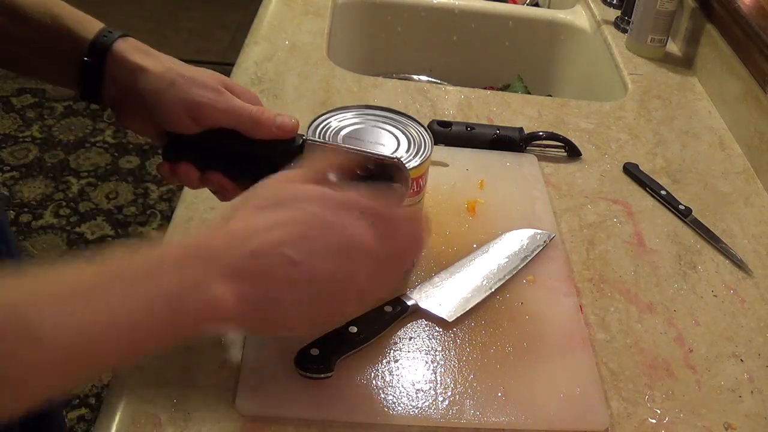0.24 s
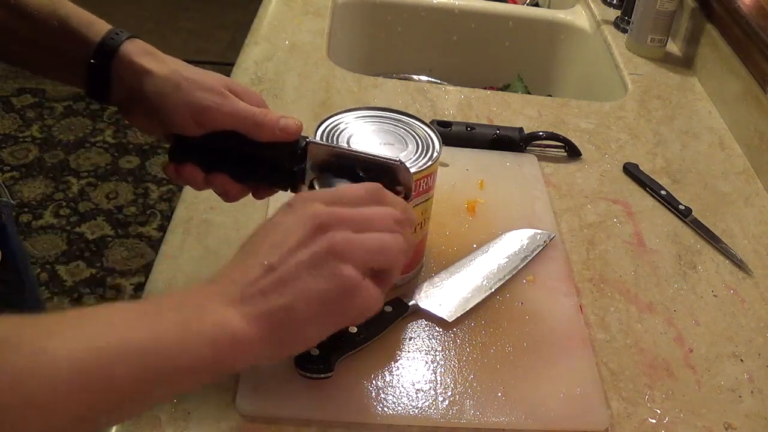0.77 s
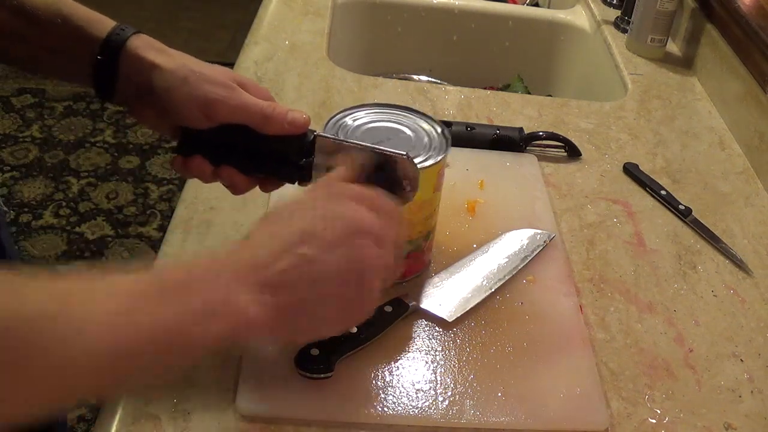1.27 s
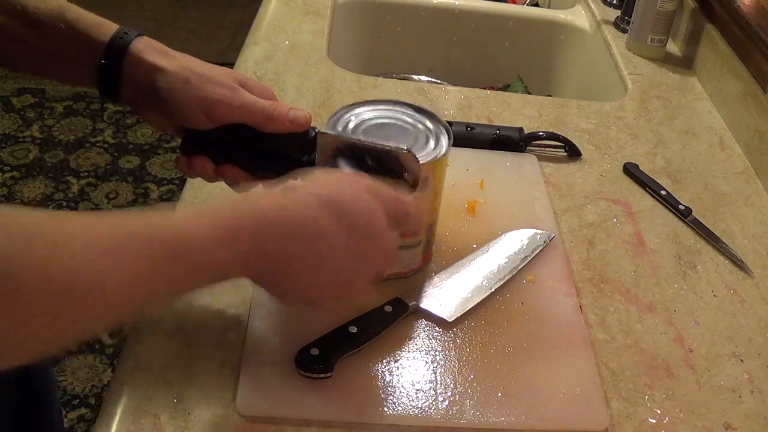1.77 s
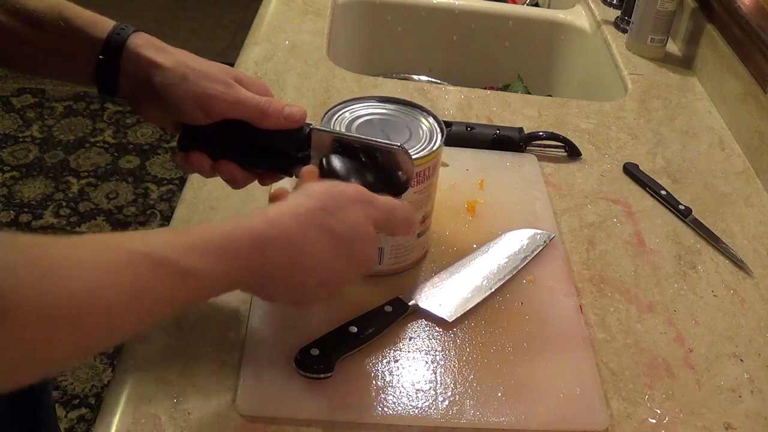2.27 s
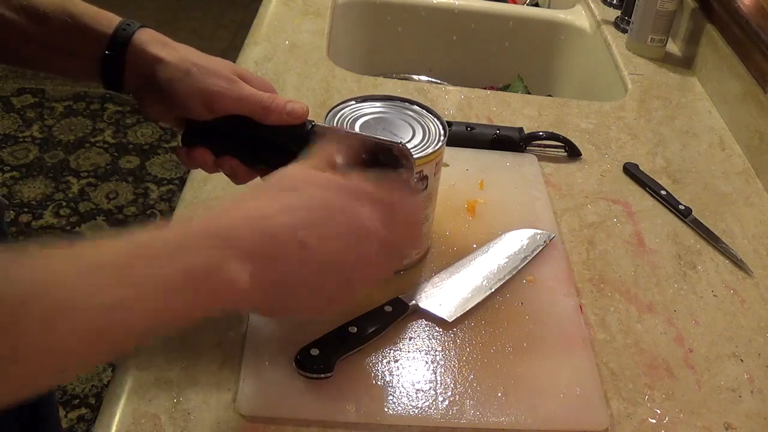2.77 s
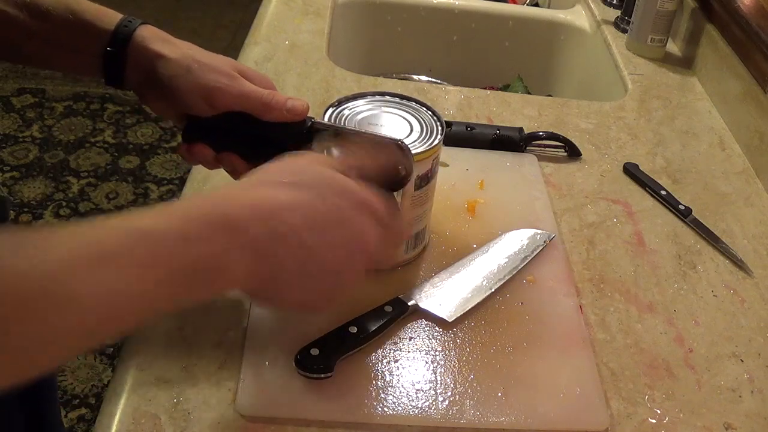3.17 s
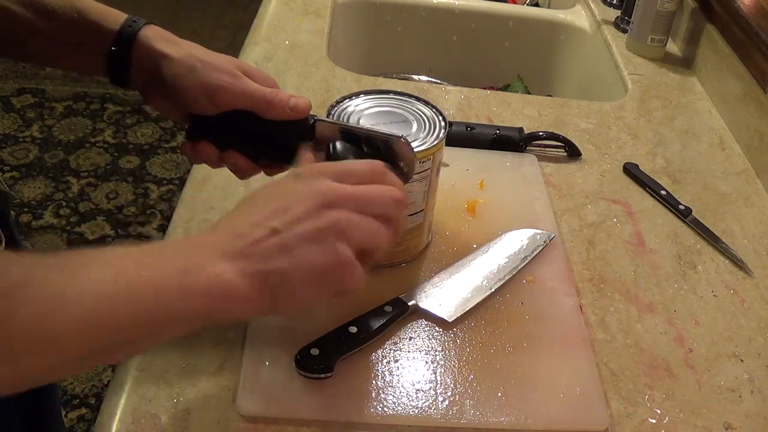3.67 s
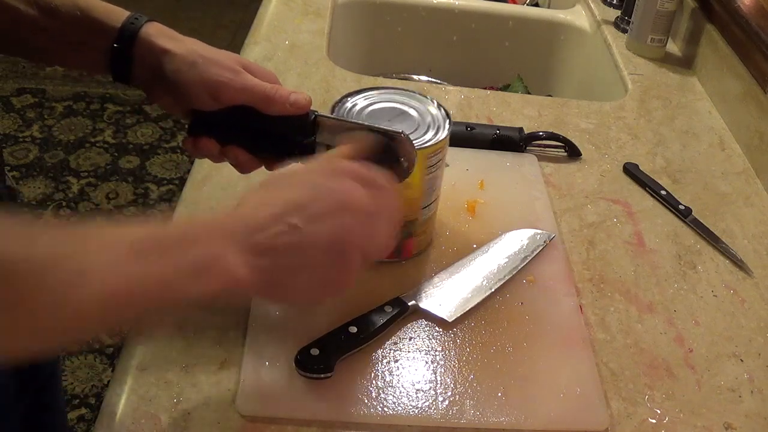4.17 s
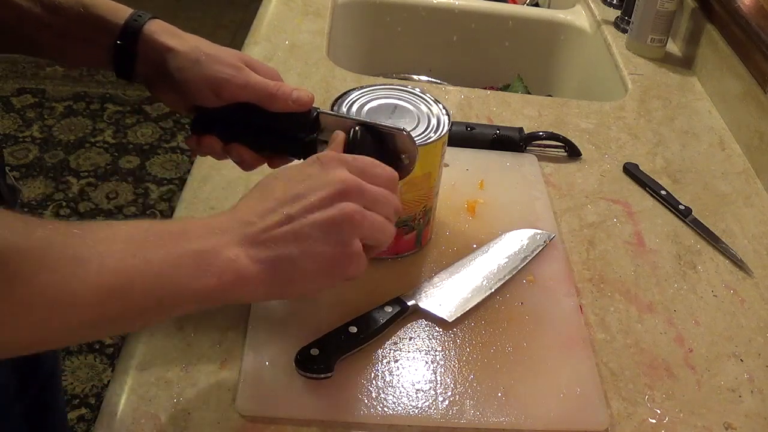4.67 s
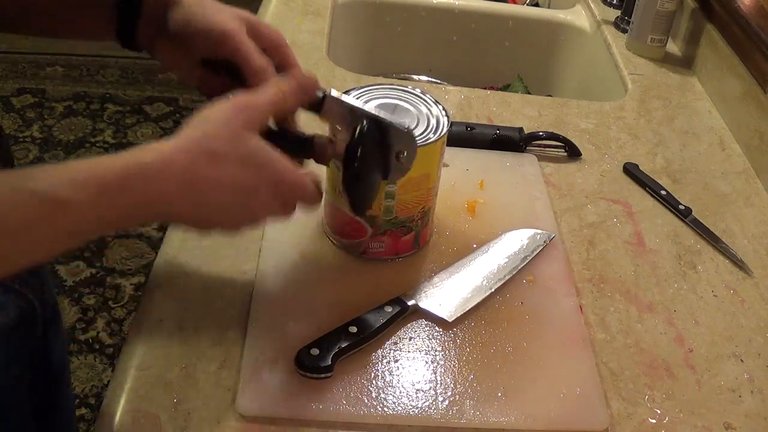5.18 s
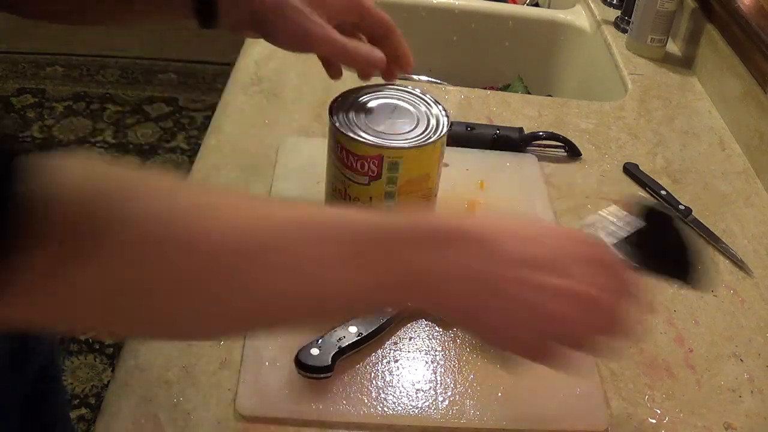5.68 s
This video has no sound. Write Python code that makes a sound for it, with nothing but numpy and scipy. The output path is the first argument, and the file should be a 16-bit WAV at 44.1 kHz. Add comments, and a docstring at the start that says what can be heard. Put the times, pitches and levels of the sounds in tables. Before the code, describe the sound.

A manual can opener rasps along the rim of a tin in short, even strokes, close to a stereo microphone. The gears click and the lid rings, higher toward the end of the cut. After a few small ticks come three steel clacks as the opener is released and laid down. Behind it are a light rustle of sleeves, a faint fridge hum and the slight echo of a kitchen.

```python
"""Opening a tin in the kitchen

A hand-cranked opener cuts round a full tin on the counter, close to a stereo pair. Each half turn the
toothed wheel grinds along the rim and rings the lid, whose note rises as it comes free; gear and handle
tick in between. The jaws snap open, the steel handles clack and the opener is laid down.
Hands and sleeves rustle, and a fridge hums in the room."""
import sys
import numpy as np
from scipy import signal
from scipy.fft import rfft, irfft, next_fast_len
from scipy.io import wavfile
from scipy.ndimage import uniform_filter1d, map_coordinates

SR = 44100
rng = np.random.default_rng(int(sys.argv[2]) if len(sys.argv) > 2 else 0)


def inscribe(sig):
    """Save sig as 16-bit PCM at rate SR to the path in sys.argv[1].

    A 1-D sig is mono; a 2-D sig holds one channel per row.
    Samples are clipped to [-1, 1] before scaling.
    """
    pcm = np.round(np.clip(np.atleast_2d(sig).T, -1, 1) * 32767)
    wavfile.write(sys.argv[1], SR, pcm.astype(np.int16))


N = 261954

# how far the lid is cut free: t/s, share/0-1
LID_FREEDOM = [(1.5, 0.16), (2.6, 0.22), (3.5, 0.38), (3.8, 0.78), (4.3, 0.99)]


def amp(db):
    """Gain of a level in dB."""
    return 10 ** (np.asarray(db) / 20)


def unit(x):
    """x scaled to rms 1."""
    return x / np.sqrt(np.mean(x ** 2) + 1e-20)


def along(points, hz):
    """Rows of f/Hz, value, read at hz on a log axis."""
    f, v = np.transpose(points)
    return np.interp(np.log(hz + 1), np.log(f + 1), v)


def curve(rows):
    """One value per sample from rows of t/s, value."""
    return np.interp(np.arange(N) / SR, *np.transpose(rows))


def wobble(rate):
    """A smooth random curve, rate knots a second."""
    return map_coordinates(rng.standard_normal(int(N * rate / SR) + 4), [np.arange(N) * rate / SR])


def filtered(x, response):
    """x times a complex response of frequency."""
    m = next_fast_len(N + SR // 2)
    return irfft(rfft(x, m) * response(np.fft.rfftfreq(m, 1 / SR)), m)[..., :N]


def colour(points):
    """Response of a spectrum with rows of f/Hz, level/dB."""
    return lambda hz: amp(along(points, hz))


def modes(table):
    """Causal response of resonances of alternating sign, with rows of f/Hz, width/Hz, level/dB."""
    return lambda f: sum((-1) ** k * amp(db) * 1j * f * width / (hz * hz - f * f + 1j * f * width)
                         for k, (hz, width, db) in enumerate(table))


def evened(x, response):
    """x through a response scaled to a power gain of 1 for white noise."""
    power_gain = np.mean(np.abs(response(np.linspace(1, SR / 2, 4096))) ** 2)
    return filtered(x, response) / np.sqrt(power_gain)


def grit(spike_db, chatter_db, chatter_hz):
    """Rough contact: noise whose samples vary widely in size, in an uneven chatter."""
    spikes = np.minimum(rng.exponential(size=N), 5)
    return unit(rng.standard_normal(N) * amp(spike_db * spikes + chatter_db * wobble(chatter_hz)))


def crank_force():
    """Gains of lid, rim and rasp: each push bites, swells to full force, holds and eases off."""
    # pushes on the crank: t/s, bite level/dB, time to full force/s, full level/dB, length/s, brightness/dB
    turns = [(-.008, -30, 0.093, -21, 0.14, 0), (0.424, -27.5, 0.081, -16.5, 0.13, -3),
             (0.859, -26.5, 0.075, -17, 0.14, -2), (1.269, -26.5, 0.084, -16.5, .128, -1),
             (1.698, -28.5, 0.076, -17, 0.14, -1), (2.119, -25, 0.1, -19, .13, -2),
             (2.528, -29, 0.11, -18, 0.14, -0.5), (2.959, -26, 0.076, -20, 0.13, -0.5),
             (3.365, -29.5, 0.065, -17.5, 0.14, 0.5), (3.781, -23.5, 0.062, -15, 0.099, 1),
             (4.171, -30, 0.069, -16.5, 0.14, 0), (4.619, -46, 0.019, -38.5, 0.047, -3),
             (4.792, -46, 0.015, -40, 0.042, -17), (4.944, -36, 0.014, -44.5, 0.014, -5)]
    bite_s, coast_s, hold_share = 0.014, 0.019, 0.4  # the teeth dig in; the wheel coasts to a stop
    gains, t = np.zeros((3, N)), np.arange(N) / SR
    for s, bite_db, swell, full_db, length, bright_db in turns:
        on = (t >= s) & (t <= s + length + coast_s)
        hold_end = swell + hold_share * (length - swell)
        knots = s + np.sort([0, bite_s, swell, hold_end, length, length + coast_s])
        levels = [bite_db - 20, bite_db, full_db, full_db - 1.5, full_db - 10, full_db - 24]
        lid_db = np.interp(t[on], knots, levels)
        # rim and rasp fade sooner than the lid as the wheel slows
        treble_db = lid_db + bright_db - np.interp(t[on], [knots[2], knots[4]], [0, 5.5])
        gains[:, on] = amp([lid_db, treble_db - 3, treble_db - 10])
    return gains


def tooth_slips(per_s, size_db, decay_s):
    """Gain of the cut: it jumps whenever a tooth slips on the rim, then sinks back."""
    jumps = (rng.random(N) < per_s / SR) * amp(size_db + 1.53 * rng.standard_normal(N))
    return unit(1 + signal.lfilter([1], [1, -np.exp(-1 / (decay_s * SR))], jumps))


def lid(force):
    """The lid rings in its held modes, then more and more in its free ones."""
    # modes of the lid, held and cut free: f/Hz, width/Hz, level/dB
    held_modes = [(440, 59, -16), (583, 34, -10.5), (623, 14, -5.5), (694.2, 44, 2), (844, 23, -6.5),
                  (925, 40, -6.5), (974, 20.6, -1.5), (1157, 65, -5.5), (1278.4, 23.6, -6),
                  (1376, 28, -12.5), (1480, 63, -14.5), (1724, 53, -12)]
    free_modes = [(607.4, 10.6, -6), (790, 38, -3.5), (863, 51, -4), (968, 134, 1.5), (1060, 10.4, 4.5),
                  (1097, 66, -1.5), (1156, 200, 1), (1262, 44, 4.5), (1480, 130, -6), (1740, 21, -17)]
    free = np.clip(curve(LID_FREEDOM), 0, 1)
    held_ring = evened(force * np.sqrt(1 - free), modes(held_modes))
    return held_ring + evened(force * np.sqrt(free), modes(free_modes))


def cutting_wheel():
    """The wheel tears the metal and drives lid, wall, rim and counter while the crank moves."""
    # distinct rim modes: f/Hz, width/Hz, level/dB
    rim_modes = [(2240, 73, 4.5), (2740, 35, 20), (3570, 114, -13.5), (4280, 50, 1), (4350, 14, -32.5),
                 (4900, 110, 11)]
    # dense modes of the tin's wall and rim: f/Hz, level/dB
    wall_spectrum = [(250, -39), (450, -4.5), (750, -9.5), (1300, 0), (1900, -17), (3500, -40)]
    rim_spectrum = [(1200, -39), (1800, 0), (2400, 1), (3500, -4.5), (4500, -9), (6000, -31)]
    # rasp of the cut and thud through the counter: f/Hz, level/dB
    rasp_spectrum = [(2530, -35), (4300, -10.5), (5830, -1.5), (6810, -6), (10600, -3.5), (11300, -13),
                     (12000, -56), (15600, -86), (22000, -120)]
    thud_spectrum = [(15, -60), (25, -39), (54, -24), (76, -11), (156, -16.5), (204, -4), (369, -5.5),
                     (400, -3.5), (520, -23), (880, -120)]
    lid_gain, rim_gain, rasp_gain = crank_force()
    push = grit(spike_db=2.5, chatter_db=1.5, chatter_hz=139.2)
    tear = grit(spike_db=2.5, chatter_db=1, chatter_hz=206)
    crunch = tooth_slips(per_s=90, size_db=7, decay_s=0.0012)
    push = lid_gain * unit(push * np.sqrt(crunch))
    tear = unit(tear * crunch)
    scrape = lid_gain * grit(spike_db=3.5, chatter_db=4.5, chatter_hz=117.9)
    free = curve(LID_FREEDOM)
    wall = amp(-9 - 4 * free) * evened(scrape, colour(wall_spectrum))  # a freer lid outrings the wall
    rim = amp(-11) * evened(rim_gain * tear, modes(rim_modes))
    rim += amp(-4) * evened(rim_gain * tear, colour(rim_spectrum))
    rasp = amp(-4.5) * evened(rasp_gain * tear, colour(rasp_spectrum))
    thud = amp(-20.5 - 5.3 * free) * evened(push, colour(thud_spectrum))
    return amp(-2.5) * lid(push) + wall + rim + rasp + thud


def room_air():
    """Room tone at both microphones: a soft rush whose bands swell and sink in patches."""
    # spectrum of the air: f/Hz, level/dB
    air_spectrum = [(15, -51), (25, -18), (124, -7.5), (323, -10), (377, 1.5), (488, -7), (776, -7),
                    (1030, -4), (1340, -3.5), (1560, -9), (2130, -9), (2970, -10), (5820, -29),
                    (10000, -51), (12000, -57), (15600, -73), (22000, -120)]
    # depth of its patches: f/Hz, depth/dB
    patch_depth = [(300, 4), (1500, 3.5), (3000, .8), (10000, .3)]
    hz, _, bands = signal.stft(rng.standard_normal((2, N)), SR, nperseg=1024)
    patches = uniform_filter1d(uniform_filter1d(rng.standard_normal(bands.shape[1:]), 4, 0), 6, 1)
    bands *= amp(along(patch_depth, hz)[:, None] * unit(patches))
    pair = signal.istft(bands, SR, nperseg=1024)[1][:, :N]
    return amp(-54) * unit(filtered([[1, 0.6], [0.34, 0.99]] @ pair, colour(air_spectrum)))


def fridge():
    """A faint mains hum that wavers slightly in level."""
    # hum tone: f/Hz, level/dB
    tones = [(120, -73.5)]
    t = np.arange(N) / SR
    return sum(amp(db + 1.5 + 0.94 * wobble(3.96)) * np.sin(2 * np.pi * hz * t) for hz, db in tones)


def sleeves():
    """Hands and sleeves brush about with a grainy rustle."""
    # strength of the brushing: t/s, level/dB
    brushing = [(0, -44), (.18, -52.5), (.83, -56), (2.55, -52.5), (3.14, -53.5), (4.88, -56), (5.34, -51),
                (5.94, -56.5)]
    # spectrum of rubbed cloth: f/Hz, level/dB
    cloth = [(290, -49), (500, -2), (688, 3.5), (1300, -13), (1990, -3.5), (10500, -8), (12000, -15),
             (15600, -57), (22000, -120)]
    friction = np.array([grit(spike_db=2, chatter_db=2, chatter_hz=25) for _ in range(2)])
    pair = [[0.66, 0.84], [0.067, 1]] @ friction
    return amp(curve(brushing) - 4) * unit(filtered(pair, colour(cloth)))


def gear_ticks():
    """Each tick is a noisy ping over a wide crack; it knocks the lid and clinks the handle."""
    # ticks of gear teeth, wheel and handle: t/s, level/dB, f/Hz
    ticks = [(.0357, -33, 3480), (0.2, -33, 9800), (.3, -38, 3476), (.3234, -42, 3500), (0.43, -33, 5550),
             (.729, -31, 2160), (0.7404, -32, 7710), (0.905, -36, 8400), (1.0747, -35.5, 10100),
             (1.1711, -29.5, 3580), (1.2735, -32, 6750), (1.285, -22, 2180), (1.3195, -13, 10100),
             (1.5017, -40, 9100), (1.5746, -25, 2260), (1.5915, -33, 3630), (1.6748, -32, 6630),
             (1.939, -37, 7600), (2.0327, -31, 3020), (2.1407, -19.5, 2140), (2.2022, -18, 3900),
             (2.2198, -27, 5940), (2.3472, -30, 6100), (2.4552, -25, 3760), (2.5442, -30, 2280),
             (2.8718, -31.5, 3020), (2.878, -26.5, 6960), (2.9635, -19, 2250), (3.016, -10, 9500),
             (3.0543, -12, 10360), (3.064, -18, 10000), (3.135, -26.5, 8500), (3.28, -36, 8150),
             (3.288, -36.5, 4520), (3.3226, -31.5, 7500), (3.3664, -23, 9800), (3.4292, -10, 9800),
             (3.465, -11, 8400), (3.647, -34.5, 5950), (3.7054, -31, 3500), (3.7448, -32, 7360),
             (3.758, -24.5, 10600), (3.784, -17.5, 8600), (3.824, -15, 9100), (3.9484, -34.5, 8600),
             (4.104, -30.5, 8100), (4.107, -37.5, 3080), (4.1315, -34, 7460), (4.622, -33, 8550),
             (4.7883, -36, 10200), (4.9124, -29.5, 10500), (5.186, -27.5, 5220), (5.193, -26, 4940),
             (5.289, -27.5, 10400), (5.359, -33.5, 4250), (5.397, -29, 9600), (5.4087, -34.5, 4640),
             (5.449, -26.5, 6660), (5.569, -33.5, 8200)]
    # the opener bumps the lid: t/s, level/dB
    bumps = [(.729, -24), (1.5746, -14), (1.6748, -23), (2.3904, -25), (2.8758, -21.5), (2.9343, -8),
             (4.953, -17)]
    # modes of the crank handle on its axle: f/Hz, width/Hz, level/dB
    handle_modes = [(3026, 54, 0.5), (3480, 93, 3), (3920, 55, -1)]
    faint_per_s, faint_hz = 4, 5000  # faint ticks fall at random, within an octave of this pitch
    out, knocks, clinks = np.zeros(N + SR), np.zeros(N), np.zeros(N)
    t = np.arange(SR // 20) / SR
    faint = [(when * (N - 1) / SR, -46 + 6 * size, faint_hz * 2 ** (2 * pitch - 1))
             for when, size, pitch in rng.random((round(faint_per_s * N / SR), 3))]
    for s, db, hz in ticks + faint:
        at = round(s * SR)
        jitter, hiss = rng.standard_normal((2, len(t)))
        phase = 2 * np.pi * hz * t + hz / 40000 * np.cumsum(jitter)
        ping = np.sin(phase) * amp(-60 * t * hz / 50)  # 60 dB down in 50 cycles
        crack = (hz + 4000) / 30000 * np.diff(hiss, prepend=0) * amp(-60 * t / 0.025)
        attack = 1 - np.exp(-t * hz / 0.33)
        out[at:at + len(t)] += amp(db - 2.5) * (ping + crack) * attack
        knocks[at] = amp(db - 1.5)
        clinks[at] = amp(db + 11 - 11.7 * abs(np.log2(hz / 3400)))  # ticks near the handle's pitch ring it
    for s, db in bumps:
        knocks[round(s * SR)] += amp(db)
    return out[:N] + lid(knocks) + evened(clinks, modes(handle_modes))


def opener_clacks():
    """Each blow cracks, then loose parts rattle on in the resonances of steel and tin."""
    # blows on the opener: t/s, crack level/dB, steel level/dB, tin level/dB, rattle t60/s
    blows = [(5.1996, -15, -32, -20, 0.051), (5.4559, -26.5, -25, -44, 0.043),
             (5.6457, -13.5, -30, -35, 0.26)]
    # modes of the steel opener and of the tin: f/Hz, width/Hz, level/dB
    steel_modes = [(2530, 470, -8), (4760, 830, 2.5), (6700, 700, -3), (7440, 440, 1), (10000, 5400, -12)]
    tin_modes = [(472, 430, -10.5), (990, 120, -3.5), (1392, 29, 5), (1790, 130, -5.5), (2380, 510, -5.5)]
    crack, steel, tin = np.zeros((3, N + SR))
    t = np.arange(SR // 2) / SR
    for s, crack_db, steel_db, tin_db, rattle_t60 in blows:
        at = slice(round(s * SR), round(s * SR) + len(t))
        crack[at] += amp(crack_db - 60 * t / 0.011)
        steel[at] += amp(steel_db - 60 * t / rattle_t60)
        tin[at] += amp(tin_db - 60 * t / 0.08)
    contact = crack[:N] * np.sign(rng.standard_normal(N))
    rattle = grit(spike_db=0.5, chatter_db=3.5, chatter_hz=151.9)
    snap = 0.58 * evened(contact, lambda hz: 1j * hz / (1800 + 1j * hz))  # high-pass
    steel_ring = evened(1.16 * contact + steel[:N] * rattle, modes(steel_modes))
    return snap + steel_ring + evened(tin[:N] * rattle, modes(tin_modes))


def counter_echoes(x):
    """Counter top and tiles send each microphone its own few early reflections."""
    t = np.arange(SR // 40) / SR
    early = rng.standard_normal((2, len(t))) * (rng.random((2, len(t))) < 0.04) * amp(-60 * t / 0.083)
    early /= np.linalg.norm(early, axis=1, keepdims=True)
    return signal.fftconvolve(np.pad(x, (40, 0))[None], early, axes=1)[:, :N]


def kitchen_reverb(x):
    """Each frequency dies away in the room at its own speed; a new tail every third of a second."""
    # decay of the kitchen: f/Hz, t60/s
    decay = [(200, 0.61), (600, 0.44), (1400, 0.39), (3700, 0.41), (10000, 0.22)]
    out = np.zeros((2, N + SR))
    step, delay = SR // 3, 150  # samples
    for start in range(0, N, step):
        hz, t, bands = signal.stft(rng.standard_normal((2, SR // 2)), SR, nperseg=256)
        tail = signal.istft(bands * amp(-60 * t / along(decay, hz)[:, None]), SR, nperseg=256)[1]
        tail /= np.linalg.norm(tail, axis=1, keepdims=True)
        wet = signal.fftconvolve(x[None, start:start + step], tail, axes=1)
        out[:, start + delay:start + delay + wet.shape[1]] += wet
    return [[0.8, 0.23], [0.34, 0.7]] @ out[:, :N]


def scene():
    """The opener close to the pair and almost centred, with the kitchen behind it."""
    # balance between the microphones: f/Hz, left minus right/dB
    balance = [(250, 0.5), (700, 0), (2000, 0), (8000, -0.3)]
    opener = cutting_wheel() + gear_ticks() + opener_clacks()
    direct = filtered(opener, lambda hz: amp(np.outer([0.5, -0.5], along(balance, hz))))
    reflected = amp(-7) * counter_echoes(opener) + amp(-9) * kitchen_reverb(opener)
    return amp(-1) * direct + reflected + room_air() + fridge() + sleeves()


def record(dry):
    """The microphone chain rolls off steeply near 11 kHz and passes nothing above its band limit."""
    # response of the chain: f/Hz, level/dB
    response = [(20, -2), (45, 1), (70, 1), (10900, 2), (11100, -4), (11300, -29), (12300, -29)]
    top_hz = 12279
    return filtered(dry, lambda hz: amp(along(response, hz)) * (hz < top_hz))


dry = scene()
out = record(dry)
inscribe(out)
```